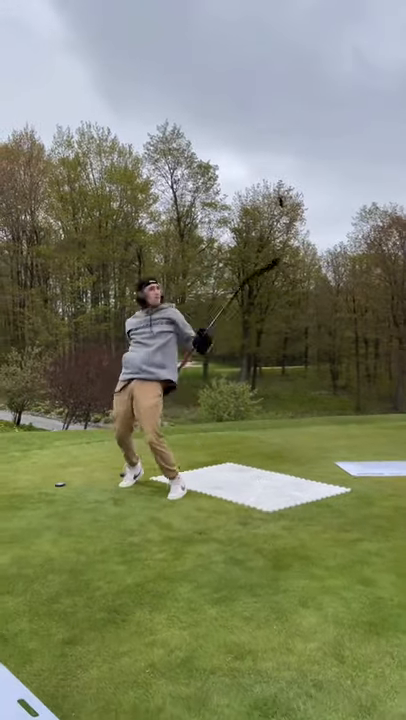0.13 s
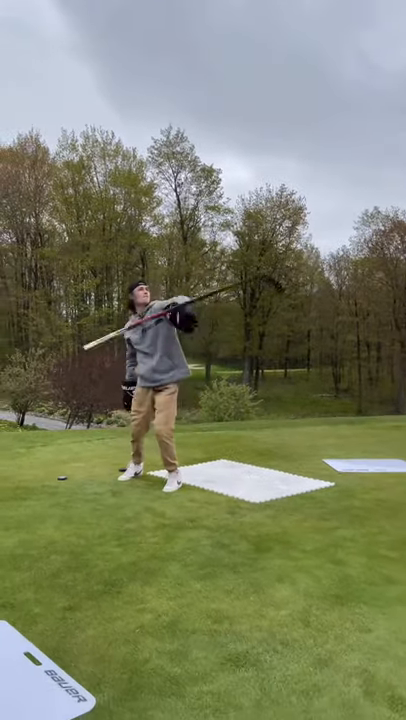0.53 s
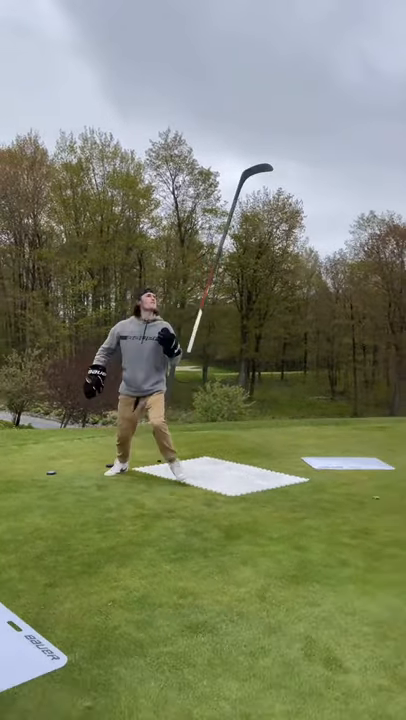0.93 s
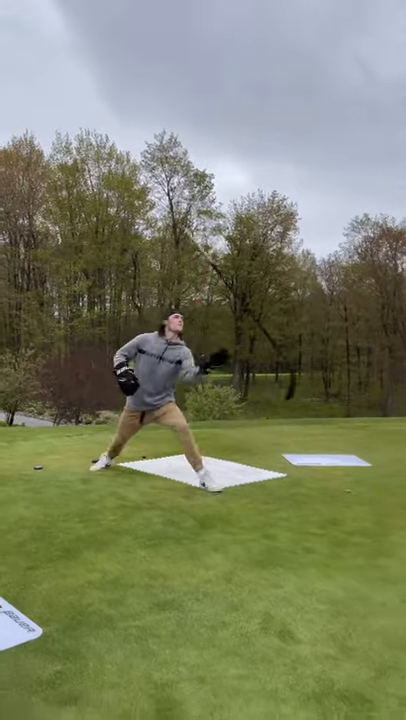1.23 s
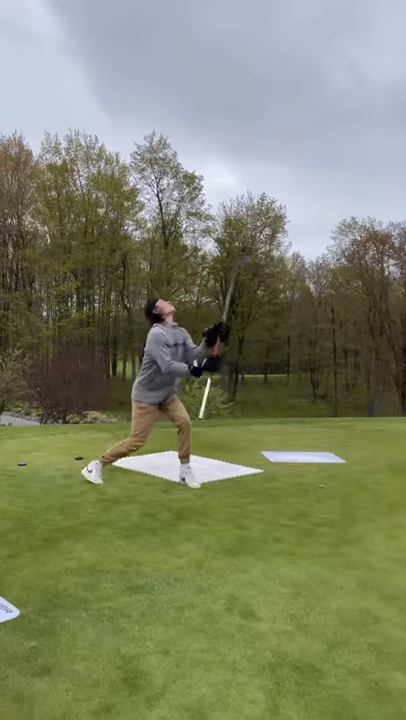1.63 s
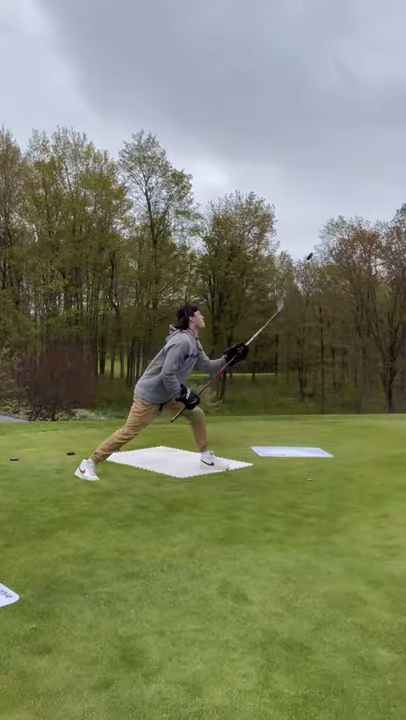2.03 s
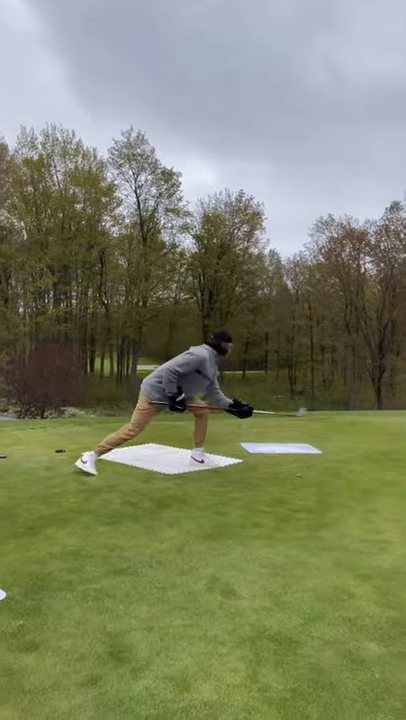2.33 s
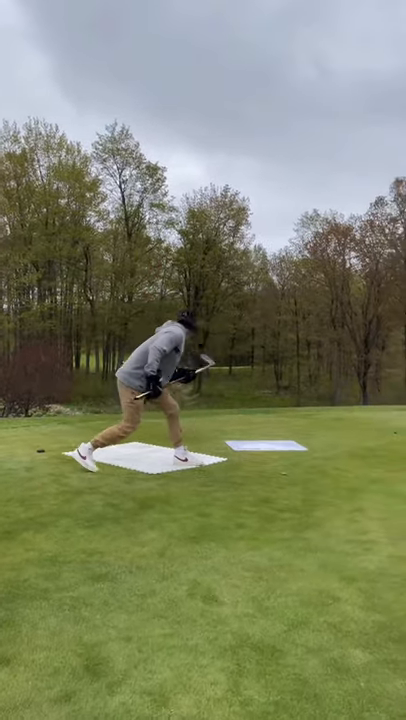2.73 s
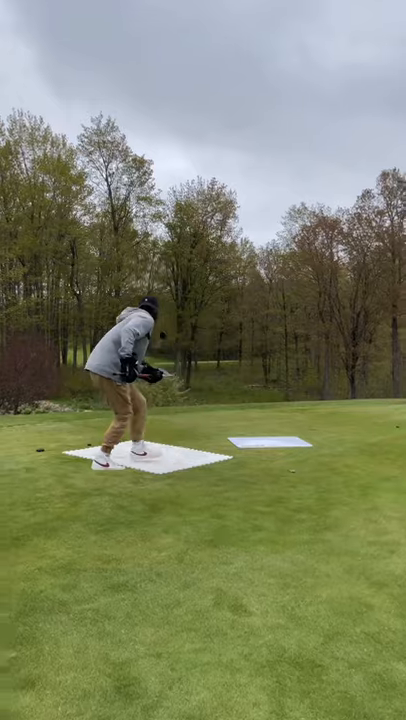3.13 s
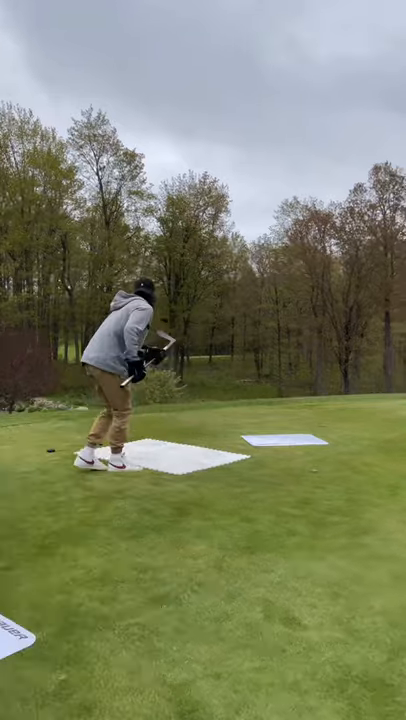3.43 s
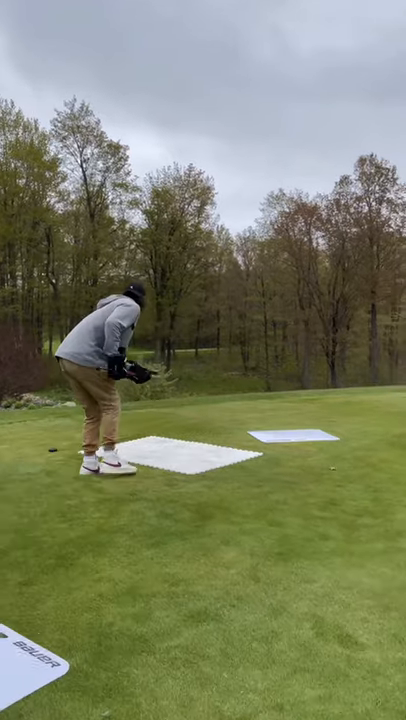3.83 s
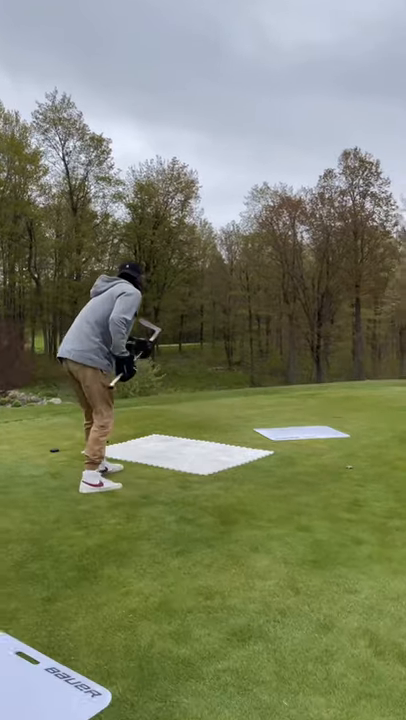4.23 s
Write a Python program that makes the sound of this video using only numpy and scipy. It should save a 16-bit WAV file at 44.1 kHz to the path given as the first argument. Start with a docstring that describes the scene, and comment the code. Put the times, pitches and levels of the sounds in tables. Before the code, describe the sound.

Faint stick clicks and soft wind puffs, one sharp slap echoing off trees, two pad knocks, and finally a harsh buffeting gust.

```python
"""On a lawn ringed by trees a player catches a twirled hockey stick, slaps a falling puck and steps over a plastic pad.
Blade, shaft and pad are banks of struck modes with noise cracks; gloves, clothes and a sliding sole are shaped noise.
The woods throw the blows back as a scattered, darkening echo, and a far bird whistles with gliding sines.
Wind puffs at the microphone and grows into a hard buffeting gust: rumble, swirling noise, thumps and crackling cores."""
import sys
import numpy as np
from scipy import signal
from scipy.fft import rfft, irfft, next_fast_len
from scipy.io import wavfile
from scipy.ndimage import uniform_filter1d, map_coordinates

SR = 44100
rng = np.random.default_rng(int(sys.argv[2]) if len(sys.argv) > 2 else 0)


def persist_wave(psi):
    """Save psi, clipped to +-1, as 16-bit WAV."""
    counts = np.round(np.clip(psi, -1, 1) * 32767).astype(np.int16)
    wavfile.write(sys.argv[1], SR, np.atleast_2d(counts).T)


N = 193599

# blade and puck chatter through the slap: t/s, ring level/dB, crack level/dB
SLAP_CONTACTS = [(2.158, -60.5, -58.5), (2.1688, -18, -22), (2.17013, -31, -14), (2.1739, -23, -20.5),
                 (2.1752, -33.5, -18), (2.1818, -35, -28.5), (2.1867, -32.5, -22), (2.2052, -52.5, -41),
                 (2.2115, -60, -39)]
# ringing modes of the blade: f/Hz, level/dB, t60/s
BLADE_MODES = [(355, -16.5, .1), (684, -21, .026), (847, -12.5, .03), (1076, -11, .04), (1292, -1.5, 0.035),
               (1610, -11, .05), (1850, -6.5, 0.014), (1975, -1, 0.055), (2094, -13.5, 0.042),
               (2450, -6, .014), (2576, 0, 0.04), (2755, -10, 0.062), (2990, -8, .025), (3645, -14, .06),
               (4120, -8.5, .02), (5900, -18, 0.029), (6380, -19.5, .04)]
# the shaft knocks as it is caught and shifted: t/s, ring level/dB, crack level/dB, wait until the rebound/s
SHAFT_TAPS = [(.131, -57, -84, .0036), (.403, -67, -64, .0051), (.487, -70, -62, .0037),
              (.629, -64.5, -69, .0045), (1.3004, -51, -45, .004), (1.3022, -41, -46, .0033),
              (1.33, -67, -57.5, .0033), (1.35, -59.5, -49, .0011), (1.368, -67, -63, 0.0034),
              (1.593, -61, -62, .0056), (1.715, -69.5, -54, .0099), (1.912, -76, -69.5, .003),
              (2.010, -58.5, -51.5, .0016), (2.628, -72.5, -70, .003)]
# ringing modes of the shaft: f/Hz, level/dB, t60/s
SHAFT_MODES = [(353, -4, .11), (540, -7.5, .08), (617, -10.5, .07), (849, -12.5, .14), (1036, -0.5, 0.057),
               (1190, -8.5, .14), (1310, -7.5, .07), (1625, -0.5, .07), (1890, -1, .067), (2190, -11, .13),
               (2543, -18, .13), (3225, -17, .05), (4010, -11, 0.06), (5900, -13.5, 0.036),
               (5700, -17, 0.012)]
# shoes knock the pad: t/s, ring level/dB, crack level/dB
STEP_CONTACTS = [(2.9055, -30, -52.5), (2.9082, -24, -47.5), (2.9098, -37.5, -40.5), (2.9123, -30, -39.5),
                 (2.918, -38, -46.5), (3.7320, -27, -29), (3.7345, -17.5, -32.5), (3.737, -37.5, -38.5),
                 (3.743, -36, -50), (3.748, -33.5, -48), (3.757, -30, -46.5), (3.767, -35, -56)]
# ringing modes of the pad: f/Hz, level/dB, t60/s
PAD_MODES = [(289, -4, 0.096), (523, -1.5, 0.017), (836, -2, 0.053), (1250, -7, 0.0036),
             (1640, -0.5, 0.011), (1820, -12, 0.036), (2200, -18, 0.024), (3000, -30, 0.081),
             (3130, -5, 0.0052), (3760, -9.5, 0.0071), (4540, -13.5, 0.015)]
# colour of the crack in every blow: f/Hz, relative level/dB
CRACK_COLOUR = [(300, -13.5), (1000, 4.5), (2500, 9.5), (4500, 2.5), (6500, 3), (8000, -0.5), (9000, 1),
                (10700, 0.5), (12500, -21.5)]
# gloves smack onto the shaft: t/s, level/dB, centre f/Hz, t60/s
GLOVE_SMACKS = [(1.591, -52, 2920, 0.055), (1.716, -76, 3060, .017), (1.976, -62, 2900, .014),
                (2.0092, -42, 2500, 0.015), (2.0118, -40.5, 970, 0.015)]
# swells of rustling: the player's clothes moving, and in the two last, long rows leaves hissing in the gust:
# t/s, level/dB, half length/s
RUSTLE_SWELLS = [(.19, -71.5, 0.056), (.46, -69.5, 0.047), (1.31, -70.5, 0.076), (1.67, -70, 0.073),
                 (2.05, -82, 0.095), (2.28, -63.5, 0.043), (2.86, -72, 0.033), (3.02, -68.5, 0.03),
                 (3.22, -78.5, 0.034), (3.44, -74, 0.038), (3.82, -72, 0.18), (4.2, -76.5, 0.36)]
# colours of the rubbing cloth and of the sliding sole: f/Hz, relative level/dB
CLOTH_COLOUR = [(800, 2.5), (2500, 1.5), (4500, -2), (7000, -3.5), (9000, -3.5), (10600, 5), (11500, -15.5),
                (12500, -23.5)]
SOLE_COLOUR = [(2000, -45), (4000, -28), (5300, -17), (6600, 2), (8000, -6), (9000, -20), (10500, -9),
               (12500, -50)]
# phase by which the player's sounds lead at the left port: f/Hz, phase/rad
LEFT_LEAD = [(20, 0), (1200, 0), (3300, .8), (4000, .9), (4650, 2.2), (5000, 4), (5700, 6), (7600, 8),
             (9000, 9.4), (11400, 11.7), (12500, 12.4)]
# steady wind at the microphone, a lull and then a gust in two surges: t/s, level/dB
STEADY_WIND = [(0, -59.5), (.7, -69.5), (.92, -61.5), (1.12, -58.5), (1.45, -67.5), (1.7, -62.5),
               (1.95, -73), (2.27, -60.5), (2.72, -76.5), (3.0, -39.5), (3.07, -37.5), (3.28, -39.5),
               (3.48, -32.5), (3.535, -37.5), (3.6, -36), (3.65, -21.5), (3.72, -19.5), (3.81, -26.5),
               (3.9, -24), (3.98, -22), (4.14, -24.5), (4.29, -22.5), (4.335, -29), (4.39, -27.5)]
# longer puffs of swirling air: t/s, swirl level/dB, half length/s, rumble level of the wake/dB
WIND_PUFFS = [(0.059, -41, 0.021, -34), (0.318, -43.5, 0.023, -33), (0.463, -50.5, 0.036, -36),
              (0.596, -51.5, 0.012, -36.5), (0.868, -49, 0.0042, -40.5), (1.042, -57, 0.006, -36),
              (1.213, -55, 0.01, -38.5), (1.581, -41, 0.0057, -32), (1.645, -61, 0.0064, -38.5),
              (2.034, -47.5, 0.021, -39), (2.173, -40, 0.027, -36.5), (2.237, -41.5, 0.054, -30.5),
              (2.402, -43, 0.015, -36), (2.518, -45, 0.021, -48.5), (2.898, -38.5, 0.023, -41),
              (3.023, -46, 0.0028, -31), (3.102, -27, 0.034, -28), (3.213, -29, 0.0041, -28.5),
              (3.314, -33, 0.0077, -24.5), (3.394, -22, 0.0065, -41.5), (3.455, -25.5, 0.01, -24.5),
              (3.617, -35, 0.0053, -27.5), (3.677, -30, 0.021, -24.5), (3.734, -31, 0.0042, -21.5),
              (3.959, -24, 0.032, -16.5), (4.118, -36, 0.006, -22.5), (4.175, -30.5, 0.01, -19.5),
              (4.376, -18.5, 0.019, -18.5)]
# colours of the deep rumble, of a puff's wake and of the swirling air: f/Hz, relative level/dB
RUMBLE_COLOUR = [(15, -44), (30, -24), (42, -6), (55, 0), (70, 1.5), (100, -2), (150, -9), (250, -19),
                 (400, -34), (800, -57.5), (1500, -120)]
WAKE_COLOUR = [(15, -45), (30, -27), (45, -10), (65, 1), (100, 2), (150, -4.5), (250, -14), (400, -29.5),
               (800, -55.5), (1500, -120)]
SWIRL_COLOUR = [(60, -28.5), (140, -2), (260, 1), (450, -1), (700, 0), (1000, -4), (2000, -10), (4000, -4),
                (8000, 1.5)]
# vortex cores that snap on the microphone: t/s, peak level/dB, width/s
VORTEX_CORES = [(3.043, -16.5, 0.00031), (3.089, -19.5, 0.0004), (3.124, -12.5, 0.00034),
                (3.186, -16.5, 0.00041), (3.214, -19.5, 0.00043), (3.238, -16, 0.00034),
                (3.318, -14.5, 0.00035), (3.376, -23, .0004), (3.397, -20.5, 0.00018), (3.43, -26, .00026),
                (3.447, -20, .00028), (3.484, -24, 0.00031), (3.516, -40.5, 0.00021),
                (3.562, -23.5, .00032), (3.583, -37, .00025), (3.619, -27.5, .00025), (3.635, -24, 0.00018),
                (3.649, -20, 0.00015), (3.666, -20.5, .00012), (3.681, -23, 0.00017), (3.699, -8, 0.00022),
                (3.715, -14.5, .00011), (3.727, -19, .00014), (3.824, -20, 0.00024), (3.831, -21, .00021),
                (3.86, -33, 0.00025), (3.872, -11, 0.00021), (3.877, -25, 0.00013), (3.902, -18, 0.00015),
                (3.9235, -12, 0.000277), (3.944, -18.5, .00015), (3.961, -6.5, 0.00018),
                (3.985, -30, 0.00025), (4.019, -23.5, 0.00016), (4.031, -14.5, 0.00024),
                (4.04, -27, .00014), (4.066, -12, 0.00015), (4.072, -25, 0.00025), (4.095, -31.5, 0.00012),
                (4.159, -34.5, 0.0002), (4.18, -15.5, 0.00025), (4.2145, -17, .00012),
                (4.22, -22.5, 0.00015), (4.232, -33, 0.00016), (4.239, -24, 0.00047),
                (4.246, -12.5, 0.00033), (4.255, -27, 0.00018), (4.264, -25, 0.00017),
                (4.296, -31, 0.00019), (4.305, -39, 0.0001), (4.367, -19, 0.00015), (4.3749, -7.5, .00014),
                (4.3813, -12, 0.00017)]
# single eddies that thump the microphone: t/s, peak level/dB, upper edge f/Hz
EDDY_THUMPS = [(0.02, -34.5, 524), (0.037, -33, 615), (0.053, -33, 710), (.067, -26, 665),
               (0.086, -32, 636), (0.117, -35.5, 450), (.168, -26.5, 660), (0.201, -40.5, 560),
               (0.292, -36.5, 534), (0.313, -49, 505), (.328, -26, 625), (0.353, -39, 450), (.44, -34, 650),
               (0.479, -34.5, 640), (.548, -39, 506), (0.593, -40, 423), (0.78, -39, 280),
               (0.869, -36.5, 420), (.956, -43, 445), (0.976, -34, 425), (1.037, -29, 500),
               (1.054, -32, 443), (1.092, -39, 416), (1.128, -41, 530), (1.146, -38, 523),
               (1.164, -45, 680), (1.198, -34, 440), (1.237, -38.5, 503), (1.267, -30, 553),
               (1.379, -40.5, 464), (1.468, -39, 352), (1.551, -33, 490), (1.583, -25.5, 506),
               (1.655, -39.5, 377), (1.716, -31.5, 276), (1.736, -32, 510), (1.793, -31.5, 292),
               (2.153, -25, 457), (2.237, -31.5, 480), (2.257, -29.5, 500), (2.388, -34.5, 416),
               (2.406, -33, 550), (2.506, -42.5, 543), (2.556, -35, 407), (2.799, -35.5, 394),
               (2.822, -35, 542), (2.89, -24.5, 592), (2.957, -29, 600), (2.987, -32, 620),
               (3.022, -21, 540), (3.09, -20, 685), (3.216, -24, 750), (3.322, -20, 647), (3.449, -36, 652),
               (3.484, -21.5, 600), (3.612, -21.5, 850), (3.699, -21, 1210), (3.716, -29, 1000),
               (3.828, -26, 900), (3.94, -15.5, 1100), (4.005, -14, 888), (4.117, -13.5, 805),
               (4.256, -17.5, 840), (4.295, -14, 910)]
# colour of a blow sent out in all directions: f/Hz, relative level/dB
SCATTERED_COLOUR = [(400, -12), (800, -6.5), (1200, -10.5), (2000, 1), (2600, 3), (3200, -10.5), (4200, -2),
                    (5000, -10.5), (6500, -9), (8000, -15), (9000, -25), (10600, -19.5), (12500, -32.5)]
# big trees that stand out of the echo: delay/s, rise in level/dB, half length/s
BIG_TREES = [(.058, 5.5, 0.0049), (.12, 6.5, 0.0097), (.157, 1.5, .008), (.248, 6.5, 0.0062)]
# a bird's two falling whistles: t/s, f/Hz, level/dB
BIRD_WHISTLES = [(.4, 4350, -100), (.44, 4050, -87), (.5, 3760, -93), (.55, 3610, -83), (.62, 3500, -84),
                 (.65, 3480, -110), (1.665, 4900, -95), (1.696, 4510, -74), (1.734, 4080, -68),
                 (1.765, 3910, -65), (1.8, 3765, -64.5), (1.853, 3630, -67), (1.868, 3590, -80),
                 (1.88, 3560, -70), (1.965, 3360, -70), (1.99, 3345, -81), (2.08, 3400, -84),
                 (2.11, 3390, -110)]
# colour of the trees' hush: f/Hz, relative level/dB
HUSH_COLOUR = [(60, 10), (300, 3.5), (600, 2.5), (1050, -5.5), (1500, -12), (2500, -19), (4000, -23.5),
               (6000, -32), (9000, -46.5), (12500, -39.5)]

# how far a rebound lies below its tap; how much each mode's level scatters from contact to contact
REBOUND_LOSS_DB, MODE_SCATTER_DB = 10, 1
# the clothes never fall quite silent
CLOTH_REST_DB = -84.5
# one slide of a sole over the pad
SCUFF_S, SCUFF_DB, SCUFF_RISE_S, SCUFF_HOLD_S, SCUFF_FADE_DB_PER_S = 3.55, -64.5, .07, 0.06, 200
# the deep rumble at full gust; it loses RUMBLE_SLOPE dB for each dB that the wind drops, and follows it late
GUST_DB, RUMBLE_DB, RUMBLE_SLOPE, RUMBLE_LAG_S = -23, -25.5, 0.46, 0.041
# a puff's slow wake arrives this much later and swells with this half length
WAKE_LAG_S, WAKE_HALF_S = 0.016, 0.019
# stray puffs while the wind is under LULL_DB: rate, mean rise above the wind, spread either way, middling half length
STRAY_PER_S, STRAY_DB, LULL_DB, STRAY_SPREAD_DB, STRAY_HALF_S = 12, 10, -50, 4, .0045
# the woods' answer: ground and nearby bushes reply at once, the far trees ring on
ECHO_ONSET_S, NEAR_T60_S, FAR_T60_S, FAR_DB = 0.023, 0.17, 2.7, -14
# the bird sits among the trees, so much of it arrives as echo
BIRD_ECHO_DB = -11.5
# upper band limit of the microphone
TOP_HZ = 12800


def amp(db):
    """Decibels to gain."""
    return 10 ** (np.asarray(db) / 20)


def unit(x):
    """Scaled to rms 1."""
    return x / np.sqrt(np.mean(x ** 2) + 1e-20)


def along(points, hz):
    """(f/Hz, value) points read on a log frequency axis."""
    f, v = np.transpose(points)
    return np.interp(np.log(hz + 1), np.log(f + 1), v)


def curves(rows):
    """One value per sample for each column after the time."""
    s, *cols = np.transpose(rows)
    return [np.interp(np.arange(N) / SR, s, c) for c in cols]


def wobble(rate):
    """A smooth random curve, rate knots a second."""
    return map_coordinates(rng.standard_normal(4096), [np.arange(N) * rate / SR], mode="mirror")


def filtered(x, response):
    """x times a response of frequency."""
    m = next_fast_len(N + SR // 2)
    return irfft(rfft(x, m) * response(np.fft.rfftfreq(m, 1 / SR)), m)[..., :N]


def noise(spectrum, channels=2):
    """Unrelated coloured noises of rms 1."""
    white = rng.standard_normal((channels, N))
    return unit(filtered(white, lambda hz: amp(along(spectrum, hz))))


def steadied(x, span):
    """Noise with its own slow swells evened out over span seconds."""
    power = uniform_filter1d(np.mean(x ** 2, axis=0), max(8, int(span * SR)))
    return x / np.sqrt(np.abs(power) + 1e-12)


def swells(rows):
    """Bell-shaped swells (t/s, level/dB, half length/s) whose powers add."""
    power, t = np.zeros(N), np.arange(N) / SR
    for s, db, half in rows:
        near = slice(max(0, int((s - 5 * half) * SR)), int((s + 5 * half) * SR))
        power[near] += amp(db) ** 2 * np.exp(-((t[near] - s) / half) ** 2)
    return np.sqrt(power)


def blows(contacts, modes, crack_t60, attack, kick_db, contact_s=.0022):
    """Every contact drives the body's modes hard while it lasts, leaves them ringing and adds a short crack."""
    out, t = np.zeros(N + SR), np.arange(SR // 4) / SR
    hz, level, t60 = np.transpose(modes)[:, :, None]
    kick = kick_db * np.exp(-(t / contact_s) ** 2)
    rings = amp(level + kick - 60 * t / t60) * np.sin(2 * np.pi * hz * t) * (1 - np.exp(-t / attack))
    grit = np.pad(noise(CRACK_COLOUR, channels=1)[0], (0, SR))
    for s, ring_db, crack_db in contacts:
        span = slice(round(s * SR), round(s * SR) + len(t))
        out[span] += amp(ring_db + MODE_SCATTER_DB * rng.standard_normal(len(modes))) @ rings
        out[span] += amp(crack_db - 60 * t / crack_t60) * grit[span]
    return out[:N]


def slap():
    """Stick blade and puck chatter together; the blade's modes die within a tenth of a second."""
    return blows(SLAP_CONTACTS, BLADE_MODES, crack_t60=0.0095, attack=0.00034, kick_db=6.5)


def shaft_taps():
    """Each knock on the shaft is followed by one weaker rebound."""
    rattles = []
    for s, ring_db, crack_db, gap in SHAFT_TAPS:
        rattles.append((s, ring_db, crack_db))
        rattles.append((s + gap, ring_db - REBOUND_LOSS_DB, crack_db - REBOUND_LOSS_DB))
    return blows(rattles, SHAFT_MODES, crack_t60=0.023, attack=0.00028, kick_db=2.0)


def gloves(width_octaves=0.56, attack_s=0.0017):
    """A padded glove smacks the shaft: a short puff of noise around one pitch."""
    out, t = np.zeros(N), np.arange(N) / SR
    for s, db, centre_hz, t60 in GLOVE_SMACKS:
        def band(hz):
            return np.exp(-(np.log2((hz + 1) / centre_hz) / width_octaves) ** 2)
        smack = unit(filtered(rng.standard_normal(N), band))
        age = np.maximum(t - s, 0)
        out += smack * amp(db - 60 * age / t60) * np.minimum(age / attack_s, 1)
    return out


def footsteps():
    """Shoes knock the plastic pad, which rings low and briefly; its first instant is slightly held back."""
    return blows(STEP_CONTACTS, PAD_MODES, crack_t60=0.0062, attack=0.00018, kick_db=-0.9)


def rustle(grain_db=3.0):
    """Fabric and a sliding sole: fine, uneven friction."""
    cloth_level = np.hypot(amp(CLOTH_REST_DB), swells(RUSTLE_SWELLS))
    cloth = cloth_level * amp(grain_db * wobble(160)) * noise(CLOTH_COLOUR, channels=1)[0]
    age = np.arange(N) / SR - SCUFF_S
    fading_s = np.maximum(age - SCUFF_RISE_S - SCUFF_HOLD_S, 0)
    slide = np.clip(age / SCUFF_RISE_S, 0, 1) * amp(SCUFF_DB - SCUFF_FADE_DB_PER_S * fading_s)
    return cloth + slide * amp(grain_db * wobble(200)) * noise(SOLE_COLOUR, channels=1)[0]


def lawn(x, t60=.13, onset_s=0.0082):
    """The ground, the pads and the player's body scatter a short bright answer."""
    t = np.arange(SR // 4) / SR
    tail = rng.standard_normal(len(t)) * amp(-60 * t / t60) * np.minimum(t / onset_s, 1)
    return signal.fftconvolve(x, tail / np.linalg.norm(tail))[:N]


def from_player(x):
    """The player stands a little left: that port hears the treble first."""
    ports = np.array([[1], [-1]])
    return filtered(x, lambda hz: np.exp(.5j * ports * along(LEFT_LEAD, hz)))


def stray_puffs():
    """Weak puffs at random moments while the wind is low: t/s, level/dB, half length/s."""
    chance = rng.random((200, 4))
    when = chance[:, 0] * N / SR
    wind_db = np.interp(when, *np.transpose(STEADY_WIND))
    puff_db = wind_db + STRAY_DB + STRAY_SPREAD_DB * (2 * chance[:, 1] - 1)
    rows = np.transpose([when, puff_db, STRAY_HALF_S * 2 ** (chance[:, 2] - .5)])
    return rows[(wind_db < LULL_DB) & (chance[:, 3] < STRAY_PER_S * N / SR / len(chance))]


def swirl(corner):
    """Eddy noise of steady level; viscosity kills the eddies above the moving corner frequency."""
    hz, s, z = signal.stft(noise(SWIRL_COLOUR, channels=1), SR, nperseg=256)
    damping = np.exp(-(hz[:, None] / np.interp(s, np.arange(N) / SR, corner)) ** 0.95)
    return steadied(signal.istft(z * damping, SR, nperseg=256)[1][:, :N], span=0.015)[0]


def deep_rumble(steady_db, heave_db=2):
    """The slow pressure of the wind, which builds late, plus the wakes that trail the puffs."""
    t = np.arange(N) / SR
    wakes = swells([(s + WAKE_LAG_S, db, WAKE_HALF_S) for s, _, _, db in WIND_PUFFS])
    lagging_db = np.interp(t - RUMBLE_LAG_S, t, steady_db)
    pressure = amp(RUMBLE_DB + RUMBLE_SLOPE * (lagging_db - GUST_DB) + heave_db * wobble(22))
    rumble = pressure * steadied(noise(RUMBLE_COLOUR, channels=1), span=0.05)
    return rumble + wakes * steadied(noise(WAKE_COLOUR, channels=1), span=0.03)


def buffeting(corner_hz=185, growth=0.54, gust_growth=0.064, flutter_db=6.5, churn_db=-1, puff_db=2.0,
              side_db=-5, side_flutter_db=-1.5, side_fineness=0.95, side_puff_db=-6.0):
    """Turbulence on the ports: the harder it blows, the finer and brighter its eddies."""
    steady_db = curves(STEADY_WIND)[0]
    rumble = deep_rumble(steady_db)
    # a hard gust holds so many eddies that it flutters less
    flutter = flutter_db * (1.5 - np.clip((steady_db + 49.0) / 16, 0, 1)) * wobble(110)
    puffs = swells([*((s, db + puff_db, half) for s, db, half, _ in WIND_PUFFS), *stray_puffs()])
    force = np.hypot(amp(steady_db + churn_db + flutter), puffs)
    # the eddy size follows the wind, smoothed over about 20 ms
    smooth_force = uniform_filter1d(force, size=900)
    speed = (smooth_force / amp(-32.0)) ** growth * amp(gust_growth * (steady_db + 37.5))
    corner = 120 + corner_hz * speed
    # small eddies meet one port at a time, so the difference between the ports flutters on its own
    side_steady = amp(steady_db + side_db + side_flutter_db * wobble(90))
    side_force = np.hypot(side_steady, amp(side_puff_db) * puffs)
    side = side_force * swirl(side_fineness * corner + 60)
    return rumble + force * swirl(corner) + np.array([side, -side])


def cores(rows):
    """Vortex cores (t/s, peak level/dB, width/s): each is a brief dip of pressure between two rises."""
    out, t = np.zeros(N), np.arange(N) / SR
    for s, db, width in rows:
        near = slice(max(0, int((s - .008) * SR)), int((s + .008) * SR))
        u = (t[near] - s) / width
        out[near] -= amp(db) * (2 * np.exp(-u ** 2 / 2) - np.exp(-u ** 2 / 8))
    return out


def small_cores(per_second, size_db, growth, width_s, widening, spread_octaves, db_per_octave, scatter_db,
                from_db_below_gust):
    """Rows of random cores: slower air carries weaker, wider ones, and the finest are the weakest."""
    chance = rng.random((4000, 4))
    when = chance[:, 0] * N / SR
    gust_db = np.interp(when, *np.transpose(STEADY_WIND)) - GUST_DB
    octaves = spread_octaves * (chance[:, 2] - .5)
    peak_db = size_db + growth * gust_db + db_per_octave * octaves + scatter_db * (chance[:, 1] - .5)
    rows = np.transpose([when, peak_db, width_s * amp(-widening * gust_db) * 2 ** octaves])
    return rows[(gust_db > -from_db_below_gust) & (chance[:, 3] < per_second * N / SR / len(chance))]


def eddies():
    """Cores crackle on both ports once the gust builds; others pass between the ports and push them opposite ways."""
    shared = small_cores(per_second=330, size_db=-26, growth=0.58, width_s=0.00022, widening=0.37,
                         spread_octaves=1.15, db_per_octave=11, scatter_db=8, from_db_below_gust=19.5)
    between = small_cores(per_second=70, size_db=-26.5, growth=0.77, width_s=0.00019, widening=0.03,
                          spread_octaves=1.1, db_per_octave=9, scatter_db=20.5, from_db_below_gust=60)
    return cores([*VORTEX_CORES, *shared]) + np.array([[1], [-1]]) * cores(between)


def thumps(lag_cycles=1.7, low_cut_hz=85, steepness=3.37, bend_hz=60, centre_hz=400):
    """Each eddy shoves the diaphragm once; the bass of the shove lags, so it sounds as a quick falling wobble."""
    out, size = np.zeros(N + SR), SR // 4
    hz = np.fft.rfftfreq(size, 1 / SR)
    # the shove sits mid-buffer at centre_hz, with lower pitches later
    delay = size / SR / 2 + lag_cycles * (1 / (hz + bend_hz) - 1 / (centre_hz + bend_hz))
    for s, db, top_hz in EDDY_THUMPS:
        phase = 2 * np.pi * (np.cumsum(delay) * hz[1] + rng.random())
        colour = np.exp(-(hz / top_hz) ** steepness) * hz ** 3 / (hz ** 3 + low_cut_hz ** 3)
        shove = irfft(colour * np.exp(-1j * phase), size)
        out[round(s * SR):][:size] += amp(db) * shove / np.abs(shove).max()
    return out[size // 2:][:N]


def blurred(x):
    """What a blow sends out in all directions: the same burst, its modes smeared together."""
    envelope = np.sqrt(np.abs(uniform_filter1d(x ** 2, size=130)))
    return envelope * noise(SCATTERED_COLOUR, channels=1)[0]


def woods(x, loss_db_per_khz=5.5, trunks_db=3.5, patchy_db=4):
    """Trunks scatter the sound back; the longer its path, the more treble the air takes (loss per kHz and second)."""
    hz, s, z = signal.stft(rng.standard_normal((2, SR)), SR, nperseg=256)
    decay = np.hypot(amp(-60 * s / NEAR_T60_S), amp(FAR_DB - 60 * s / FAR_T60_S))
    answer = np.minimum(s / ECHO_ONSET_S, 1) ** 2 * decay
    db = trunks_db * rng.standard_normal(len(s))
    for delay, rise_db, half in BIG_TREES:
        db = db + rise_db * np.exp(-((s - delay) / half) ** 2)
    # smooth random patches over time and pitch
    patches = uniform_filter1d(rng.standard_normal(z.shape[1:]), size=4, axis=0)
    db = db + patchy_db * unit(uniform_filter1d(patches, size=9, axis=1))
    air_loss_db = loss_db_per_khz * hz[:, None] / 1000 * s
    tail = signal.istft(z * answer * amp(db - air_loss_db), SR, nperseg=256)[1]
    return signal.fftconvolve(x[None], tail / np.linalg.norm(tail[0]), axes=1)[:, :N]


def bird(waver=0.0032, flicker_db=0.5):
    """Thin whistles that slide down in pitch: one sine, slightly unsteady in pitch and level."""
    hz, db = curves(BIRD_WHISTLES)
    phase = 2 * np.pi * np.cumsum(hz * (1 + waver * wobble(130))) / SR
    return amp(db + flicker_db * wobble(41)) * np.sqrt(2) * np.sin(phase)


def hush():
    """The hush of the trees: soft wide noise, strongest in the bass, that barely wavers."""
    return amp(-57.0 + 0.23 * wobble(13.0)) * noise(HUSH_COLOUR)


def scene():
    """Blows and their echo, clothes, wind, bird and the hush of the trees."""
    stick = slap() + shaft_taps() + gloves()
    steps = footsteps()
    knocks = stick + steps
    player = from_player(knocks + amp(-22.5) * lawn(knocks) + rustle())
    wind = buffeting() + eddies() + thumps()
    song = bird()
    # the grass soaks up most of what the pad sends toward the trees
    carrying = stick + amp(-5.0) * steps
    # three independent scatterings build up the echo of the blows
    blow_echo = amp(-31.0) * sum(woods(blurred(carrying)) for _ in range(3))
    bird_echo = amp(BIRD_ECHO_DB) * woods(song)
    return player + wind + blow_echo + song + bird_echo + hush()


def record(dry, mono_below_hz=800):
    """The ports sit close together, so the bass is mono; the treble is cut steeply at the band limit."""
    mid = dry.mean(axis=0)
    side = filtered((dry[0] - dry[1]) / 2, lambda hz: 1 - 1 / (1 + (hz / mono_below_hz) ** 8))
    return filtered(np.array([mid + side, mid - side]), lambda hz: 1 / (1 + (hz / TOP_HZ) ** 80))


dry = scene()
out = record(dry)
persist_wave(out)
```